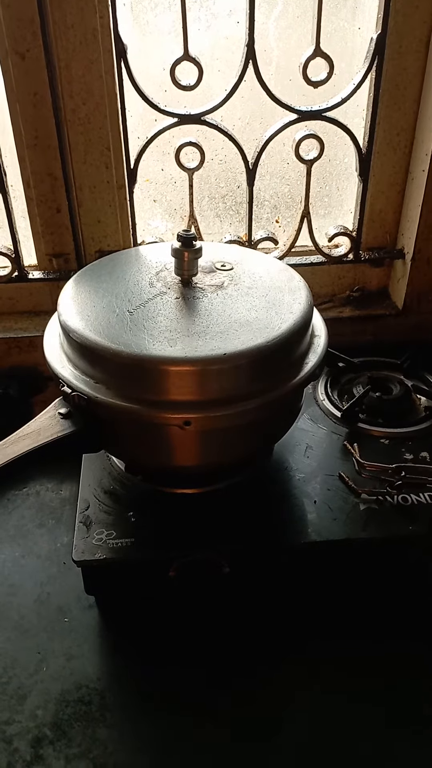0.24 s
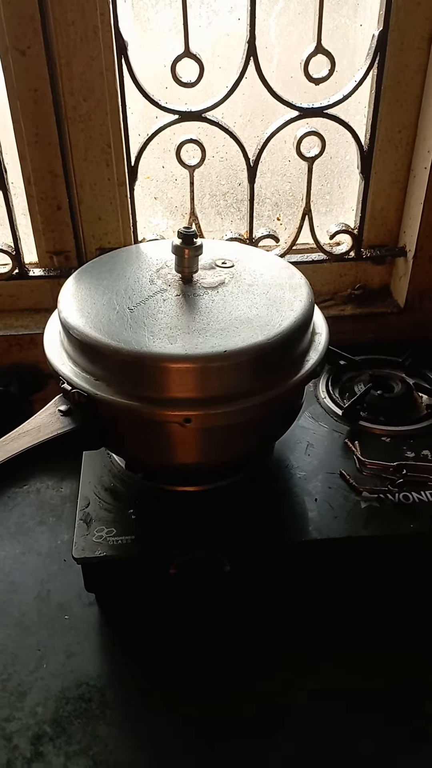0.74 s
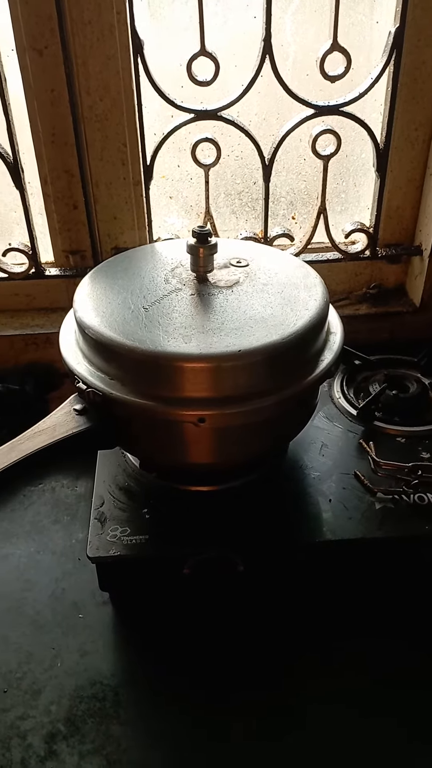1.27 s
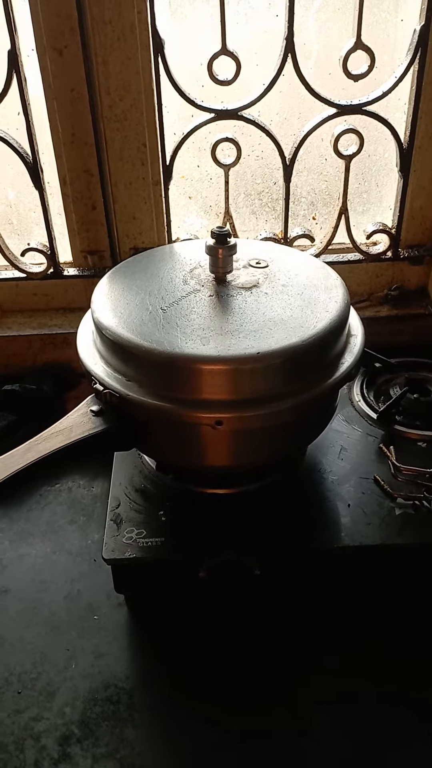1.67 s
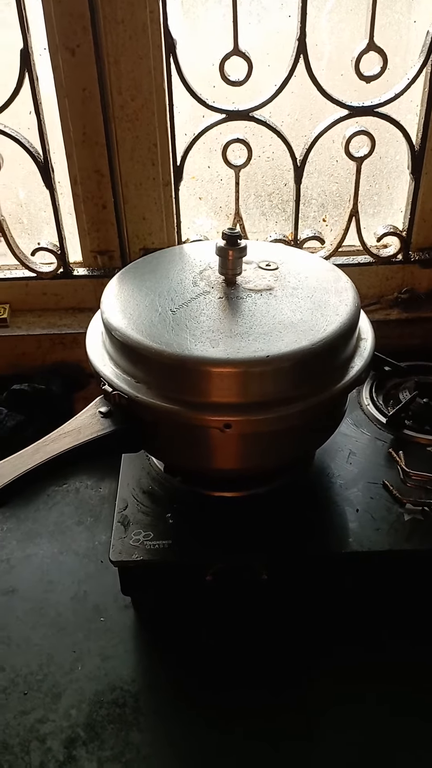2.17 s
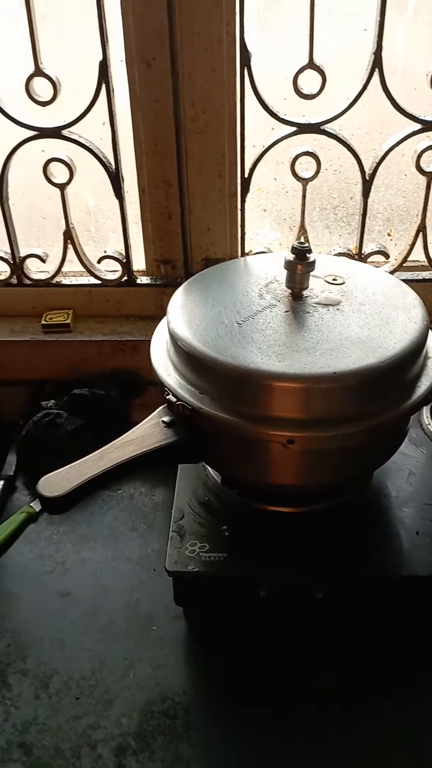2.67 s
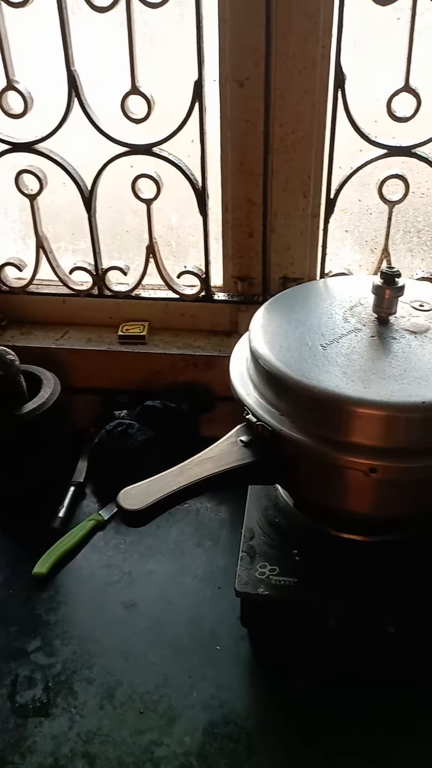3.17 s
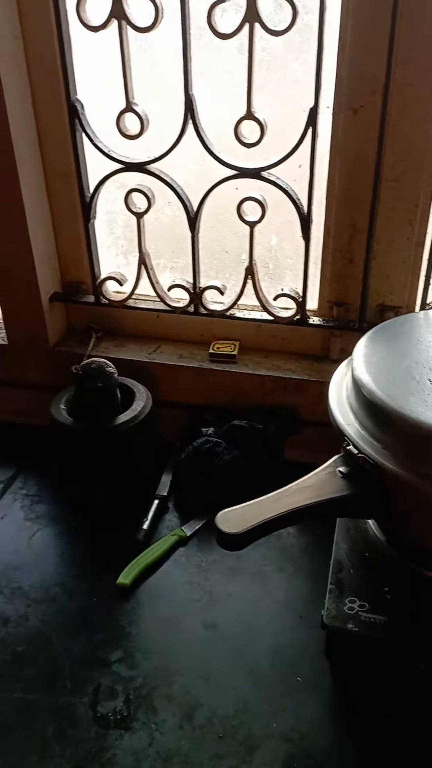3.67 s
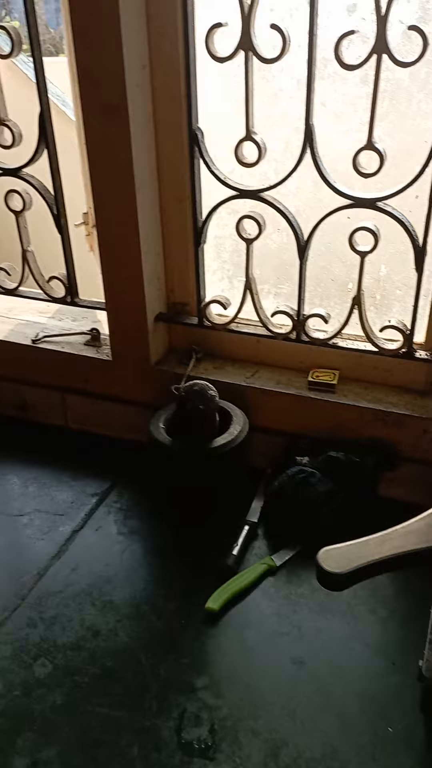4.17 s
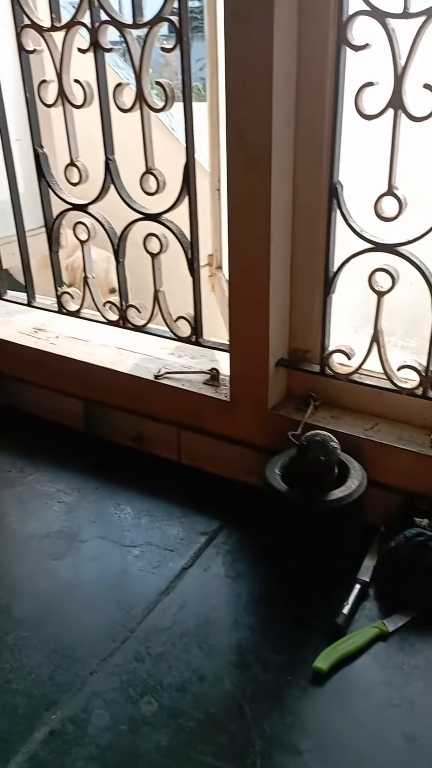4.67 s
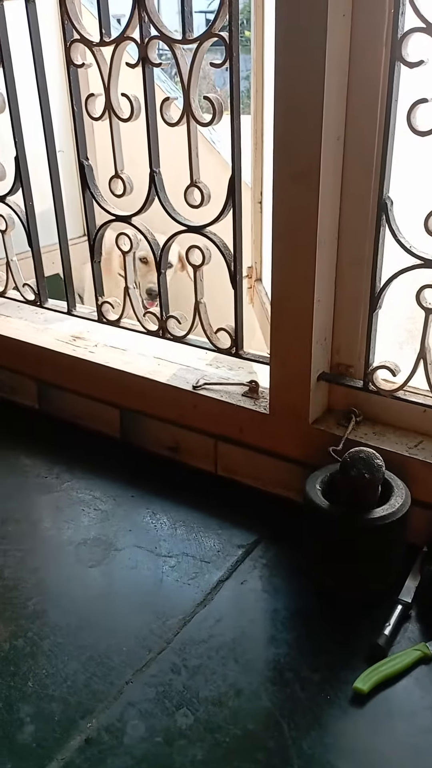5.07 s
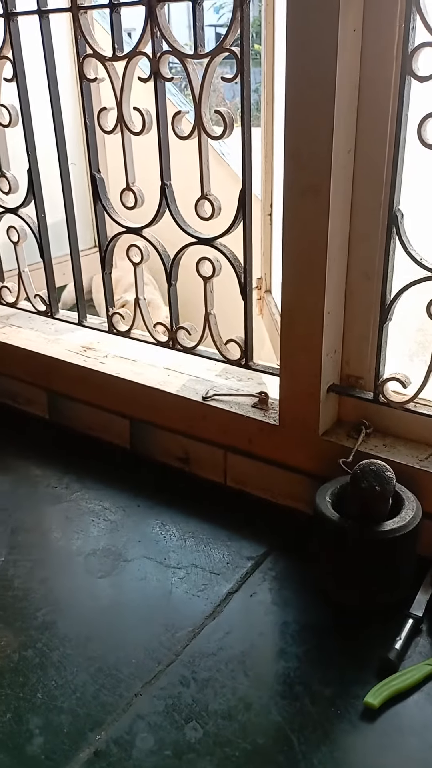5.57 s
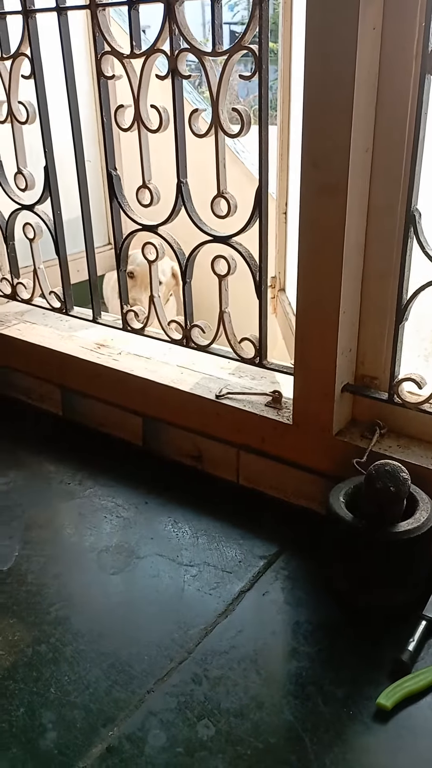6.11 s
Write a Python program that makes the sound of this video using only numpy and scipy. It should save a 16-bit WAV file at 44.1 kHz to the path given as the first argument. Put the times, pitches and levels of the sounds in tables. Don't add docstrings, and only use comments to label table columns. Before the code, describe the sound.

A pressure cooker hisses high and steadily, its jet throbbing about nine times a second, with faint metallic taps and low kitchen murmur beneath.

```python
import sys
import numpy as np
from scipy import signal
from scipy.fft import rfft, irfft, next_fast_len
from scipy.io import wavfile
from scipy.ndimage import uniform_filter1d, map_coordinates

SR = 44100
rng = np.random.default_rng(int(sys.argv[2]) if len(sys.argv) > 2 else 0)


def natural_amplitude(level_db):
    exponent = np.asarray(level_db, float) / 20
    return 10 ** exponent


def dump_mix(stems):
    frames = np.atleast_2d(stems).T
    limited = np.clip(frames, -1, 1)
    pcm = np.round(limited * 32767).astype(np.int16)
    wavfile.write(sys.argv[1], SR, pcm)


N = 279726
FRAME = 512
HZ = np.fft.rfftfreq(FRAME, 1 / SR)[:, None]


def unit(x):
    return x / np.sqrt(np.mean(np.abs(x) ** 2) + 1e-20)


def along(points, hz):
    f, v = np.transpose(points)
    return np.interp(np.log(hz + 1), np.log(f + 1), v)


def smooth(times, values, t):
    index = np.arange(len(times))
    place = np.interp(t, times, index)
    whole = np.floor(place)
    eased = whole + .5 - .5 * np.cos(np.pi * (place - whole))
    return np.interp(eased, index, values)


def patches(shape, bins, frames):
    field = uniform_filter1d(rng.standard_normal(shape), size=bins, axis=-2)
    return unit(uniform_filter1d(field, size=frames, axis=-1))


def rush(gain, alike, lag, patchy_db, echo=0.):
    _, t, z = signal.stft(rng.standard_normal((3, N)), SR, nperseg=FRAME, noverlap=FRAME * 3 // 4)
    direct, wash = z[0], z[1:]
    share, echo = np.clip(alike(t), 0, 1), np.clip(echo, 0, 1)
    ramp = np.exp(-1j * np.pi * HZ * lag(t) / SR)
    real, imag = patches((2,) + wash.shape, bins=2, frames=220)
    walls = np.sqrt(echo / 2) * (real + 1j * imag) * direct + np.sqrt(1 - echo) * wash
    pair = np.sqrt(share) * direct * [ramp, ramp.conj()] + np.sqrt(1 - share) * walls
    shaped = pair * gain(t) * natural_amplitude(patchy_db * patches(direct.shape, bins=6, frames=20))
    sound = signal.istft(shaped, SR, nperseg=FRAME, noverlap=FRAME * 3 // 4)[1]
    return unit(sound[:, :N])


# (time of full lift [s], swing [dB], delay until it seats [s])
ROCKS = [(.051, 5, 0.076), (.166, 7.5, 0.062), (.317, 6.5, 0.032), (.44, 5.5, .037),
         (.592, 9, 0.054), (.706, 3, 0.067), (.816, 7, 0.037), (.912, 6, 0.042), (.993, 3.5, 0.068),
         (1.149, 2.5, .019), (1.227, 6, .12), (1.443, 9.5, .052), (1.587, 7.5, .028),
         (1.678, 8, .043), (1.777, 5.5, .069), (1.908, 3, 0.036), (2.015, 3, 0.042),
         (2.114, 7, .073), (2.249, 4.5, 0.039), (2.329, 6, 0.1), (2.474, 6.5, 0.028),
         (2.586, 6, 0.051), (2.702, 7, 0.071), (2.812, 5.9, 0.069), (2.962, 11, 0.059),
         (3.094, 8.5, 0.041),
         (3.196, 10, 0.041), (3.282, 5.5, .076), (3.415, 10.1, 0.029), (3.515, 5, 0.04),
                 (3.613, 5.5, 0.051), (3.704, 7, 0.075), (3.804, 7, 0.079), (3.929, 5, 0.072),
                 (4.046, 3, .061), (4.174, 4.5, 0.04), (4.28, 6.5, 0.042), (4.359, 6, 0.049),
                 (4.469, 6.5, 0.07), (4.557, 8, 0.057), (4.684, 3, .036), (4.836, 1.1, .18),
                 (5.022, 7.5, 0.039), (5.156, 8, 0.064), (5.271, 4.2, 0.025), (5.397, 4.1, 0.013),
                 (5.596, 3, .048), (5.845, 5, 0.053), (5.955, 4.5, 0.1), (6.117, 6, 0.065),
                 (6.251, 6, 0.05)]


def rocks():
    return np.transpose(ROCKS)


# (time [s], level [dB])
PRESSURE = [(0, -24), (.3, -21.5), (.55, -24), (.8, -21), (1.3, -24), (1.6, -21.5), (1.85, -22.5),
            (2.65, -23.5), (3.1, -22), (3.45, -21), (3.85, -23), (4.08, -21.5), (4.33, -23), (4.7, -21),
            (5.02, -24), (5.3, -21.5), (5.85, -23.5), (6.34, -22.5)]
RISE_SHARE = 0.41


def lift_db(t):
    lifts, swing_db, seat_s = rocks()
    top_db = np.interp(lifts, *np.transpose(PRESSURE)) + RISE_SHARE * swing_db
    times = np.maximum.accumulate(np.ravel([lifts, lifts + seat_s], order="F"))
    levels_db = np.ravel([top_db, top_db - swing_db], order="F")
    return smooth(times, levels_db, t)


# (frequency [Hz], level per Hz [dB])
JET = [(1000, -28), (2000, -26), (2900, -22.5), (3700, -22), (4500, -19.5), (5500, -14), (6500, -11.5),
       (7500, -7.5), (8500, -5), (9600, 0.5), (10500, -4), (11400, -13), (13000, -12.5), (15500, -23)]
# (frequency [Hz], level [dB])
FACING = [(2000, -0.5), (2900, 2), (4200, 1), (5000, 4), (5600, 2), (6200, 1), (6650, -4), (7600, 3.5),
          (9100, -1.5), (10500, -2), (12000, -1), (12800, -1), (14200, 0.5), (15300, -5)]
# (frequency [Hz], level [dB])
HALF = [(2000, 1.1), (2900, 0.5), (4200, 5), (5000, 7.5), (5600, 2.5), (6200, 4.5), (6650, -18), (7600, 4),
        (9100, 6.5), (10500, -4), (12000, -2.5), (12800, -6), (14200, 4), (15300, 1)]
# (frequency [Hz], level [dB])
AWAY = [(2000, 2), (2900, 1), (4200, 4.5), (5000, 9.5), (5600, 2), (6200, -3), (6650, -4), (7600, 4),
        (9100, 0.5), (10500, -2.5), (12000, 1), (12800, -3), (14200, 4.5), (15300, -2)]
# (time [s], turn [0-1], lag of the left port [samples])
TURN = [
    (0, 0.07, -5.5),
    (2.2, 0.23, -6),
    (3.2, 0.42, -5.5),
    (3.9, 0.7, -5),
    (4.6, 0.96, -2),
    (6.34, 0.98, 0),
]
# (frequency [Hz], likeness [0-1])
DIRECT = [(500, 0.56), (1500, 0.44), (2400, 0.47), (2950, 0.9), (3500, 0.21), (5500, 0.63), (8000, 0.22),
          (13000, 0.22)]
# (frequency [Hz], share [1])
THROB = [(800, 0.6), (2000, 0.54), (4000, 0.48), (9000, 0.91), (13000, 1.15)]
LOW_FACING_DB, LOW_AWAY_DB = 1.5, -1.15


def steam():
    when, turn, lag = np.transpose(TURN)

    def gain(t):
        pose = np.clip(np.interp(t, when, turn), 0, 1)
        half = 1 - np.abs(2 * pose - 1)
        end_db = np.where(pose < .5, along(FACING, HZ), along(AWAY, HZ))
        right_db = half * along(HALF, HZ) + (1 - half) * end_db
        low_db = (LOW_FACING_DB + (LOW_AWAY_DB - LOW_FACING_DB) * pose) / (1 + (HZ / 6800) ** 8)
        throb_db = along(THROB, HZ) * (lift_db(t) - np.mean(lift_db(t)))
        edge = (HZ / 900) ** 2 / (1 + (HZ / 900) ** 2)
        return edge * natural_amplitude(along(JET, HZ) + low_db + throb_db + [0 * right_db, right_db])

    def alike(t):
        return along(DIRECT, HZ) * (1 - 0.6 * np.interp(t, when, turn))

    return natural_amplitude(-21.5) * rush(gain, alike, lambda t: np.interp(t, when, lag), patchy_db=0.78, echo=0.34)


# (frequency [Hz], width [Hz], level [dB])
LID = [
    (393, 127, 1),
    (801, 138, 1.5),
    (1490, 240, -5),
]
# (time [s], peak level [dB], pitch [Hz])
TAPS = [(0.583, -39, 820), (0.912, -56, 842), (0.941, -39, 800), (1.613, -40, 773), (2.042, -40, 785),
        (2.278, -38, 770), (2.379, -58.5, 781), (3.127, -39, 806), (3.179, -49, 899), (3.547, -44, 830),
        (3.566, -43, 776), (3.653, -40, 850), (3.763, -40, 773), (3.962, -41, 773), (4.473, -51, 800)]
DRONE_SCATTER_DB, TAP_SWELL_DB, TAP_SWELL_S = 1.5, 3, .04


def lid():
    t = np.arange(N) / SR
    lifts = rocks()[0]
    tap_times = np.transpose(TAPS)[0]
    near_tap = np.exp(-((lifts[:, None] - tap_times) / TAP_SWELL_S) ** 2).max(axis=1)
    drone_db = DRONE_SCATTER_DB * rng.standard_normal(len(lifts)) + TAP_SWELL_DB * near_tap
    body = np.sqrt(sum(natural_amplitude(2 * db) / (1 + (2 * (HZ - hz) / width) ** 2) ** 2 for hz, width, db in LID))
    drone = rush(lambda t: body, lambda t: .45, lambda t: 0 * t - 6, patchy_db=3.0, echo=0.26)
    out = natural_amplitude(0.63 * lift_db(t) + smooth(lifts, drone_db, t) - 47.5) * drone
    tau = t[:SR // 10]
    for at, db, hz in TAPS:
        ring = np.sin(2 * np.pi * hz * tau) + 0.4 * np.sin(2 * np.pi * 1.41 * hz * tau)
        tap = natural_amplitude(db - 60 * tau / 0.03) * (1 - np.exp(-tau / 0.0017)) * ring
        out[:, round(at * SR):][:, :len(tau)] += tap * natural_amplitude([[1.2], [-.8]])
    return out


# (frequency [Hz], level per Hz [dB])
MURMUR = [(15, -50), (25, -20), (43, -15), (91, -3.5), (151, -5), (184, -1), (330, -7), (418, -6.5),
          (474, -8), (635, -8.5), (700, -21), (910, -27), (1540, -120)]
# (frequency [Hz], likeness [0-1])
MURMUR_ALIKE = [(40, 0.36), (130, 0.77), (290, 0.92), (640, 0.18)]
# (frequency [Hz], width [Hz], level over the murmur [dB])
HUM = [(104, 8, -2), (133, 9, 0), (183, 10, 0.1), (235, 25, -5), (303, 10, -1), (421, 10, 4)]
# (time [s], level [dB])
FLAME = [
    (0.0, -58),
    (0.07, -61.5),
    (0.41, -58),
    (0.49, -60.5),
    (2.3, -59),
    (2.45, -58),
    (5.88, -59.5),
    (5.91, -54.5),
    (6.22, -61),
    (6.34, -62),
]
FLICKER_DB, FLICKER_PER_S = 1, 12


def murmur():
    times, flame_db = np.transpose(FLAME)
    place = np.arange(N) * FLICKER_PER_S / SR
    flicker_db = FLICKER_DB * map_coordinates(rng.standard_normal(size=200), [place])
    low = rush(lambda t: 1, lambda t: along(MURMUR_ALIKE, HZ), lambda t: 0 * t, patchy_db=1.0)
    size = next_fast_len(N)
    f = np.fft.rfftfreq(size, 1 / SR)
    tones = sum(natural_amplitude(db) / (1 + (2 * (f - hz) / width) ** 2) for hz, width, db in HUM)
    low = irfft(rfft(low, size) * natural_amplitude(along(MURMUR, f)) * (1 + tones), size)[:, :N]
    return natural_amplitude(np.interp(np.arange(N) / SR, times, flame_db) + flicker_db + 1.2) * unit(low)


# (time [s], level [dB])
BOOMS = [
    (.3, -60.5),
    (3.33, -57),
    (4.42, -65),
    (6.05, -62),
]
BOOM_HZ, BOOM_S = 102, 0.1


def street():
    t = np.arange(N) / SR
    swell = sum(natural_amplitude(db) * np.exp(-((t - at) / BOOM_S) ** 2) for at, db in BOOMS)
    return swell * np.sin(2 * np.pi * BOOM_HZ * t)


def kitchen(x, wet_db, t60, count):
    t = np.arange(SR // 3) / SR
    place = np.arange(N) * (count - 1) / N
    tails = rng.standard_normal((count, 2, len(t))) * natural_amplitude(-60 * t / t60) * (1 - np.exp(-t / 0.0024))
    tails /= np.linalg.norm(tails, axis=-1, keepdims=True)
    fades = np.cos(np.pi / 2 * np.clip(place - np.arange(count)[:, None, None], -1, 1))
    answers = signal.fftconvolve(fades * x, tails, axes=-1)[..., :N]
    return x + natural_amplitude(wet_db) * answers.sum(axis=0)


def scene():
    cooker = kitchen(steam() + lid(), wet_db=-5.5, t60=0.17, count=12)
    return natural_amplitude(-1.19) * cooker + murmur() + street()


def band_limit(x):
    return signal.sosfilt(signal.butter(12, 15900, fs=SR, output="sos"), x)


def record(dry):
    return band_limit(dry)


dry = scene()
out = record(dry)
dump_mix(out)
```